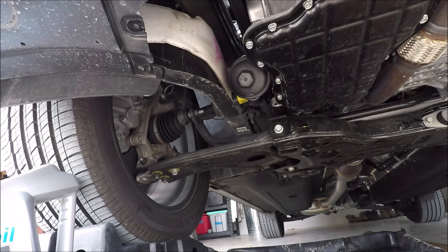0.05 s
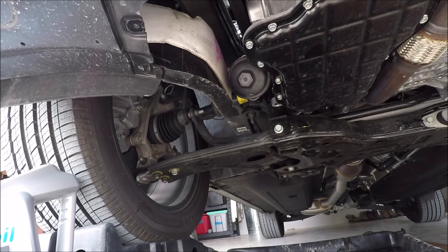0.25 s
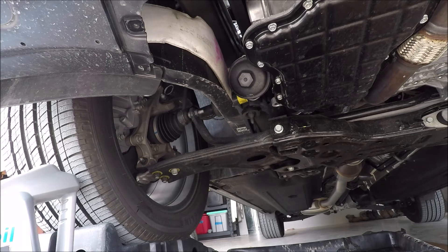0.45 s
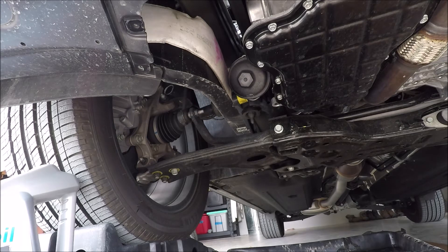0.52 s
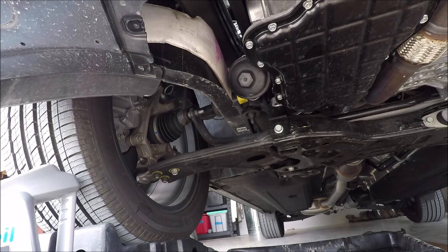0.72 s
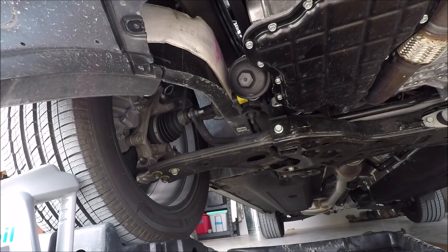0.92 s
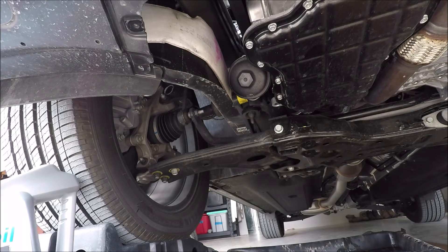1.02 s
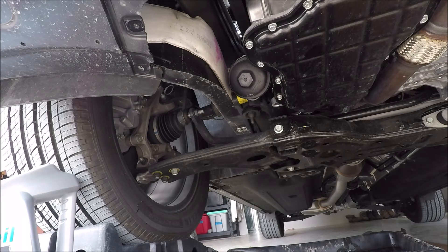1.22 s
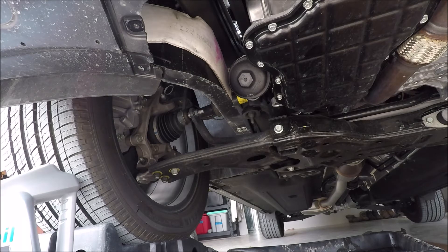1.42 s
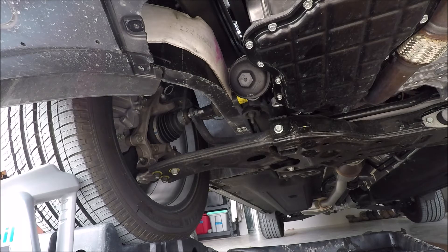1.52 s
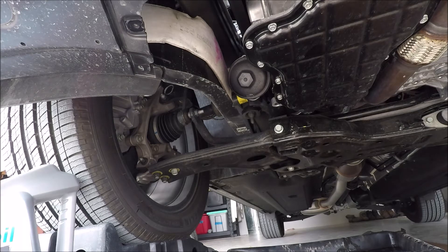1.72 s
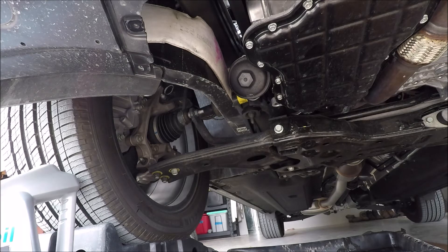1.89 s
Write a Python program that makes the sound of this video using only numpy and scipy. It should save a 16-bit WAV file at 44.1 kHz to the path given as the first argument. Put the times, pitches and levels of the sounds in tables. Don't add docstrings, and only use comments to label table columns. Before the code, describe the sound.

Oil drips in a garage: faint irregular ticks and scrapes first, a loud wet metallic smack midway, then thuds, a sharp snap and a soft distant slide, with faint motor hum, room air and microphone handling.

```python
import sys
import numpy as np
from scipy import signal
from scipy.fft import rfft, irfft
from scipy.io import wavfile
from scipy.ndimage import uniform_filter1d

SR = 44100
rng = np.random.default_rng(int(sys.argv[2]) if len(sys.argv) > 2 else 0)


def volts_from_db(level):
    exponent = np.asarray(level, float) / 20
    return 10 ** exponent


def unload_audio(sound):
    columns = np.transpose(np.atleast_2d(sound))
    steps = np.round(np.clip(columns, -1, 1) * 32767)
    wavfile.write(sys.argv[1], SR, steps.astype(np.int16))


N = 85995

# (frequency [Hz], density [dB])
AIR_SPECTRUM = [(94, -51), (160, -7), (380, -9), (700, -16.5), (1000, -17.5), (1300, -21), (2600, -17.5),
                (5200, -23), (7000, -38)]
# (frequency [Hz], density [dB])
HISS_SPECTRUM = [(2000, -18), (5000, -2.5), (8000, -0.5), (11000, -3.5), (15800, -3)]
# (frequency [Hz], density [dB])
RUMBLE_SPECTRUM = [(8.8, -33), (15, -10), (56, 3), (114, -10.5), (151, -8), (174, -18.5), (200, -24),
                   (260, -62), (440, -120)]
# (start [s], length [s], level [dB])
SLIDE_STROKE = (1.388, 0.33, -54)
# (frequency [Hz], width [Hz], level [dB])
HOLLOW_MODES = [(385, 93, 5.5), (506, 120, -1.5), (860, 29, -2), (1120, 89, -2), (2200, 480, -5),
                (3240, 230, -1.5), (3940, 230, -0.5), (4800, 840, -4.5), (7000, 3100, -15.5)]
# (start [s], length [s], level [dB], fizz [dB], boom [dB])
RUB_STROKES = [(.0, 0.2, -60, -23, -3), (0.175, 0.025, -55, -6, -2), (0.194, 0.061, -50.5, -6, -3.5),
               (0.239, 0.11, -57.5, -27, 1.5), (0.341, 0.044, -52.5, -6.5, -1),
               (0.383, 0.049, -53, -10.5, 3.5), (0.424, 0.031, -53.5, -16, 2), (0.488, 0.052, -58, -23, -4),
               (0.613, 0.031, -58.5, -11, 0), (.638, 0.044, -46, -7, -7), (0.675, 0.025, -51, -8, -6),
               (1.056, 0.03, -51, -14, -4.5), (1.076, 0.025, -47, -9, -2), (1.117, 0.084, -57.5, -12.5, -3),
               (1.862, 0.049, -54.5, -13.5, -0.5), (1.828, 0.035, -61, -13, 2.5),
               (0.682, 0.24, -67.5, -13, -1.5), (1.206, 0.18, -67.5, -8.5, -1),
               (1.909, 0.053, -60.5, -24, 4.5)]
# (frequency [Hz], width [Hz], level [dB])
CASE_MODES = [(929, 184, 1.5), (1913, 350, -2.5), (2670, 415, -1.5), (4070, 940, -7.5), (4640, 520, -1.5),
              (5260, 590, -1), (6340, 530, -8)]
# (frequency [Hz], width [Hz], level [dB])
FIZZ_MODES = [(7420, 1050, 0.5), (10500, 950, 1.5), (13200, 1700, -1.5), (14800, 1300, 0)]
# (frequency [Hz], width [Hz], level [dB])
BOOM_MODES = [(232, 114, -7), (385, 86.5, -1), (485.7, 77, -1), (595, 134, -8.5)]
# (time [s], peak [dB], centre [Hz], width [octaves], T60 [s])
TICK_EVENTS = [(.0125, -38.5, 3700, 1.36, 0.02), (0.0753, -52, 4460, 1.3, 0.0094),
               (.135, -45, 8000, 2.4, .008), (.18, -36, 6000, 2, 0.0093), (0.246, -42, 10000, 1.7, 0.0064),
               (0.3276, -33, 2320, 1.7, 0.011), (0.33, -34, 1980, 0.99, 0.018),
               (.4172, -32, 4500, 3.1, 0.0036), (.628, -40, 9000, 2.6, .008), (.6435, -29, 9000, 2, 0.027),
               (0.6547, -32.5, 6000, 1.9, 0.0037), (.6658, -31, 6000, 1.9, .005),
               (.716, -41.5, 10000, 3.9, 0.0049), (0.8916, -37, 6960, 2.3, 0.052),
               (1.033, -37, 1300, 2.4, 0.0053), (1.0358, -45, 10500, 0.52, 0.01),
               (1.0672, -35, 1810, 1.9, 0.02), (1.073, -37, 10900, 1, 0.032),
               (1.0824, -22.5, 7000, 1.17, 0.005), (1.4053, -46, 2070, 2, .012),
               (1.3491, -39, 2200, 1.4, 0.0095), (1.3707, -43, 1910, 0.73, 0.012),
               (1.432, -44.5, 7000, 1.2, 0.012), (1.895, -42, 2000, 0.56, 0.021),
               (0.3082, -43, 2800, 0.88, .008), (.358, -42, 2580, 0.72, 0.0092),
               (.366, -43, 2380, 0.84, 0.0065), (.372, -40, 5200, 0.69, .008),
               (.398, -46, 4500, 0.76, .012), (.411, -41, 4800, 0.49, .006),
               (.524, -42.5, 2920, 1.1, 0.022), (.637, -42, 11000, 1.5, 0.013),
               (0.6464, -33, 7000, 2, 0.0087), (0.6576, -40, 7000, 2.4, .005),
               (.6745, -38, 7500, 1.8, 0.009), (.7095, -47, 11000, 1.3, .005),
               (0.9142, -34, 2500, 0.74, .006), (1.0618, -47, 5000, 2.6, .008),
               (1.0668, -43, 10000, .8, .01), (1.871, -47, 4000, 2, 0.013)]
# (time [s], peak [dB], pitch [Hz], T60 [s])
BUMP_EVENTS = [(.328, -37, 482, 0.067), (0.641, -35.5, 87, 0.1), (.68, -41.5, 184, 0.096),
               (.8925, -25, 143, 0.05), (.894, -27.5, 240, 0.029), (.895, -37, 496, 0.041),
               (.895, -38, 406, 0.036), (.894, -45, 733, 0.021), (.642, -43.5, 950, 0.072),
               (.655, -44.5, 1080, 0.078), (.668, -45, 810, 0.066), (0.43, -46, 1050, .06),
               (1.52, -51, 1120, 0.083), (1.033, -26.5, 308, 0.021), (1.033, -40.5, 970, 0.018),
               (1.0345, -21, 79.6, 0.062), (1.068, -22, 93, 0.075), (1.0728, -29, 374, 0.061),
               (1.0672, -36.5, 370, 0.043), (1.071, -33, 234, 0.077), (1.0824, -17, 5370, 0.0028),
               (.19, -47.5, 215, .1), (.93, -46, 210, 0.083), (1, -44.5, 229, 0.073), (.7, -37, 77, .1),
               (1.34, -35.5, 58.5, 0.17), (1.87, -42.5, 97, 0.11), (.42, -44.5, 950, 0.056),
               (.37, -46.5, 480, 0.073)]
# (frequency [Hz], level [dB], T60 [s])
PAN_MODES = [(1340, -8, 0.014), (1717, -4, 0.015), (1940, -1, 0.012), (2282, 0, 0.029), (2353, -28, 0.23),
             (2700, -4, 0.041), (3610, -14, 0.044), (3800, -13, 0.041), (4150, -7.5, 0.033),
             (5085, -10.5, 0.04), (5500, -11, 0.031), (2950, -18, 0.028), (8540, -11.5, 0.016),
             (9820, -17.5, 0.03)]
# (frequency [Hz], density [dB])
SPLAT_SPECTRUM = [(740, -40), (1250, -15), (1500, -12), (2400, -3), (3160, -13.5), (5130, -10.5),
                  (7180, -16), (10100, -22), (15500, -38)]
# (frequency [Hz], density [dB])
TAIL_SPECTRUM = [(530, -50), (900, -12), (1520, -11.5), (2050, -12.5), (2280, 0.5), (3260, -15.5),
                 (5240, -7), (15500, -44)]
# (start [s], length [s], low [Hz], high [Hz])
DROPOUTS = [(.12, .012, 10500, 12500), (.182, .012, 10800, 12000), (.443, .012, 5500, 15000),
            (.677, .03, 7300, 11700), (.676, .032, 13200, 13900), (.676, .032, 14500, 15100),
            (.692, .013, 7300, 11700), (.438, .024, 3000, 3450), (.674, .034, 2950, 3650),
            (.676, .032, 1150, 1750), (.68, .026, 2050, 2300), (.18, .016, 3000, 3500),
            (.18, .016, 6600, 7200), (1.04, .01, 13000, 16000), (1.824, .016, 7600, 10200),
            (1.826, .012, 10800, 15500), (1.822, .02, 6300, 7100), (1.822, .02, 4200, 4800),
            (1.822, .02, 3000, 3700)]


def evened(x):
    return x / np.sqrt(np.mean(x ** 2) + 1e-20)


def add(mix, start_s, sound):
    part = mix[round(start_s * SR):][:len(sound)]
    part += sound[:len(part)]


def slow(size):
    once = uniform_filter1d(rng.standard_normal(N), size)
    return evened(uniform_filter1d(once, size))


def coloured(spectrum, count):
    hz = np.fft.rfftfreq(count, 1 / SR)
    point_hz, point_db = np.transpose(spectrum)
    gain_db = np.interp(np.log(hz + 1), np.log(point_hz + 1), point_db, left=-80, right=-80)
    return evened(irfft(rfft(rng.standard_normal(count)) * volts_from_db(gain_db), count))


def body(drive, modes, clump_db=0):
    out = np.zeros(N)
    for k, (hz, width_hz, db) in enumerate(modes):
        gain = (-1) ** k * volts_from_db(db + clump_db * slow(size=180))
        out += gain * signal.lfilter(*signal.iirpeak(hz, hz / width_hz, SR), drive)
    return evened(out)


def ring(hz, t60_s, rise_s=0.0002):
    t = np.arange(0, 0.3, 1 / SR)
    return np.minimum(t / rise_s, 1) * volts_from_db(-60 * t / t60_s) * np.sin(2 * np.pi * hz * t)


def underside(x):
    spread_s, echo_db = 0.012, -10.5
    echoes = np.zeros(2000)
    delays = (30 + rng.random(12) * spread_s * SR).astype(int) % 2000
    echoes[delays] = volts_from_db(echo_db) * rng.choice([-1.0, 1.0], size=12)
    echoes[0] = 1
    return signal.oaconvolve(x, echoes / np.linalg.norm(echoes))[:N]


def garage():
    air_db, patch_db, hiss_db = -59.5, -0.47, -70.5
    rumble_db, lump_db = -49, 0.97
    hum_hz, hum_width_hz, hum_db = 148.2, 5.2, -63
    air = volts_from_db(air_db + patch_db * slow(size=2500)) * underside(coloured(AIR_SPECTRUM, N))
    hiss = volts_from_db(hiss_db) * coloured(HISS_SPECTRUM, N)
    rumble = volts_from_db(rumble_db + lump_db * slow(size=1500)) * coloured(RUMBLE_SPECTRUM, N)
    hum = volts_from_db(hum_db) * body(rng.standard_normal(N), [(hum_hz, hum_width_hz, 0)])
    return air + hiss + rumble + hum


def slide():
    start_s, length_s, level_db = SLIDE_STROKE
    progress = np.clip((np.arange(N) / SR - start_s) / length_s, 0, 1)
    arch = np.sin(np.pi * progress) ** 0.66
    return volts_from_db(level_db) * arch * body(rng.standard_normal(N), HOLLOW_MODES, clump_db=2.1)


def stroke(start_s, length_s):
    rise, fall = 0.25, 0.3
    u = (np.arange(N) / SR - start_s) / length_s
    ramp = np.minimum(u / rise, (1 + fall - u) / (2 * fall))
    return np.sin(np.pi / 2 * np.clip(ramp, 0, 1)) ** 2


def rubbing():
    slips_per_s, slip_spread_db, slip_share = 1500, 3.5, 0.34
    slip_gain = volts_from_db(slip_spread_db * np.minimum(rng.exponential(1, N), 3))
    slips = slip_gain * (rng.random(N) < slips_per_s / SR) * rng.standard_normal(N)
    drive = slip_share * evened(slips) + (1 - slip_share) * rng.standard_normal(N)
    case = body(drive, CASE_MODES, clump_db=1.8)
    fizz = body(drive, FIZZ_MODES, clump_db=2.3)
    boom = body(body(drive, BOOM_MODES), BOOM_MODES, clump_db=1.8)
    out = np.zeros(N)
    for start_s, length_s, db, fizz_db, boom_db in RUB_STROKES:
        sound = case + volts_from_db(fizz_db) * fizz + volts_from_db(boom_db) * boom
        out += volts_from_db(db) * stroke(start_s, length_s) * sound
    return out


def ticks():
    out = np.zeros(N)
    for time_s, peak_db, hz, octaves, t60_s in TICK_EVENTS:
        crackle = rng.standard_normal(2000)
        crackle[0] = 4
        drive = crackle * volts_from_db(-60 * np.arange(2000) / SR / t60_s)
        edges_hz = np.minimum(hz * 2 ** (np.array([-0.5, 0.5]) * octaves), [15000, 20000])
        tick = signal.lfilter(*signal.butter(2, edges_hz, "bandpass", fs=SR), drive)
        add(out, time_s, volts_from_db(peak_db) * tick / abs(tick).max())
    return out


def bumps():
    out = np.zeros(N)
    for time_s, peak_db, hz, t60_s in BUMP_EVENTS:
        add(out, time_s, volts_from_db(peak_db) * ring(hz, t60_s, rise_s=0.46 / hz))
    return out


def oil_drop():
    hit_s, modes_db = 0.8937, -18
    spread_s, spread_hz = 0.0009, 2200
    splat_db, splat_t60_s, splat_rise_s = -24.5, 0.052, 0.0022
    tail_db, tail_t60_s, tail_rise_s = -41, 0.28, 0.0045
    out = np.zeros(N)
    for k, (hz, db, t60_s) in enumerate(PAN_MODES):
        start_s = hit_s + spread_s * (hz > spread_hz)
        add(out, start_s, (-1) ** k * volts_from_db(modes_db + db) * ring(hz, t60_s, rise_s=0.00041))
    t = np.arange(0, 0.3, 1 / SR)
    splat = volts_from_db(splat_db - 60 * t / splat_t60_s) * coloured(SPLAT_SPECTRUM, len(t))
    tail = volts_from_db(tail_db - 60 * t / tail_t60_s) * coloured(TAIL_SPECTRUM, len(t))
    add(out, hit_s, splat * np.minimum(t / splat_rise_s, 1))
    add(out, hit_s, tail * np.minimum(t / tail_rise_s, 1))
    return out


def scene():
    return (garage() + slide() + rubbing() + ticks() + bumps() + oil_drop())[None]


def band_limit(x):
    return signal.sosfilt(signal.butter(12, 16480, fs=SR, output="sos"), x)


def record(dry):
    dropout_db, limit_hz = -32, 15450
    hz, t, z = signal.stft(dry, SR, nperseg=1024, noverlap=896)
    lost = np.zeros((len(hz), len(t)))
    for start_s, length_s, low_hz, high_hz in DROPOUTS:
        in_band = (hz > low_hz) & (hz < high_hz)
        in_time = (t > start_s) & (t < start_s + length_s)
        lost += in_band[:, None] & in_time
    kept = signal.istft(z * volts_from_db(dropout_db * lost), SR, nperseg=1024, noverlap=896)[1][:, :N]
    lowpass = signal.firwin(101, limit_hz, window=("kaiser", 6), fs=SR)[None]
    mix = signal.oaconvolve(kept, lowpass, "same")
    return band_limit(mix)


dry = scene()
out = record(dry)
unload_audio(out)
```